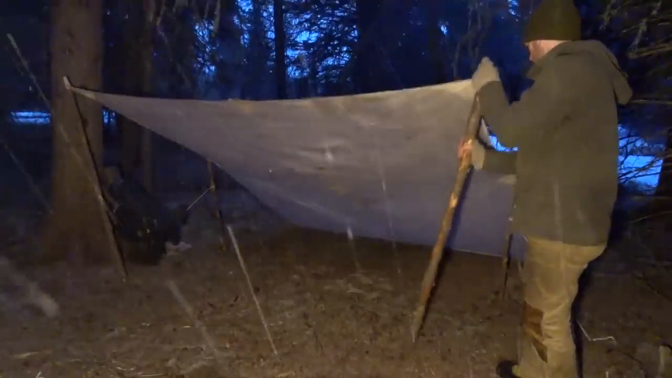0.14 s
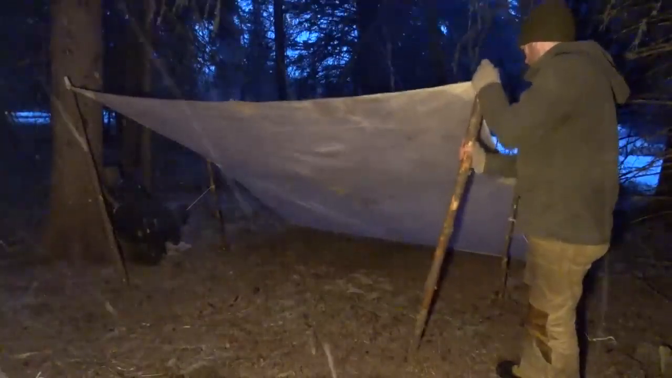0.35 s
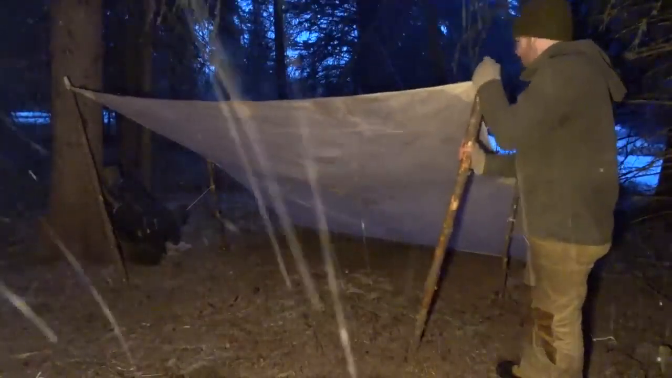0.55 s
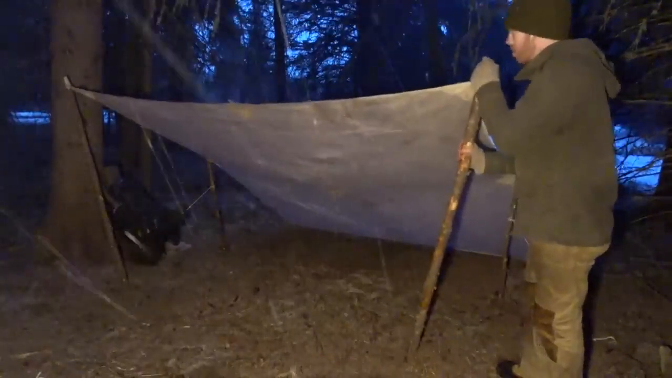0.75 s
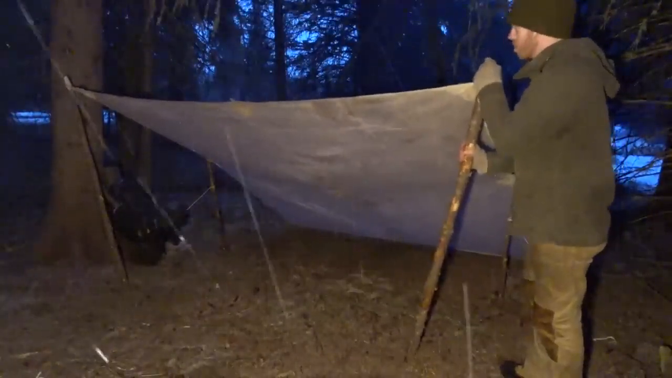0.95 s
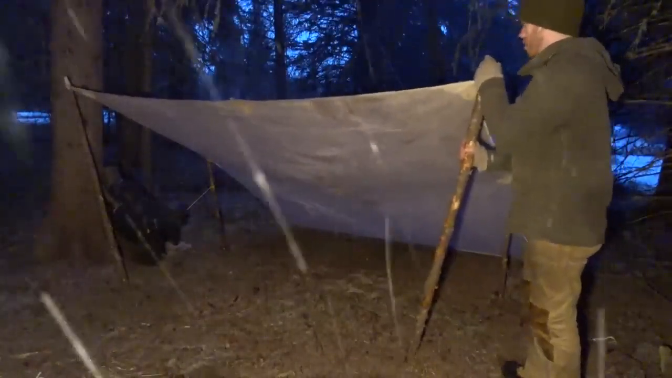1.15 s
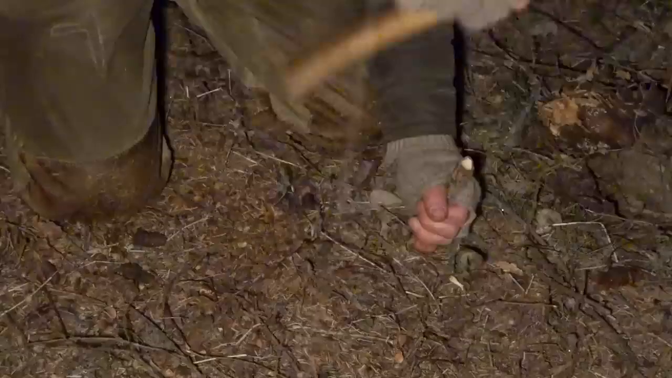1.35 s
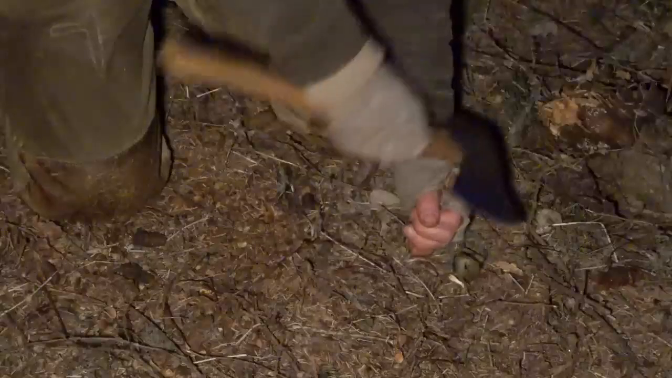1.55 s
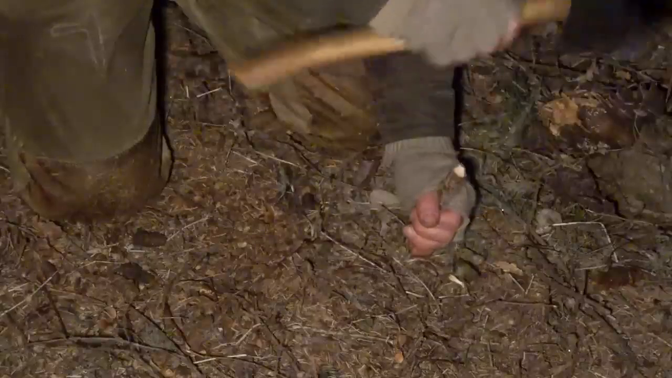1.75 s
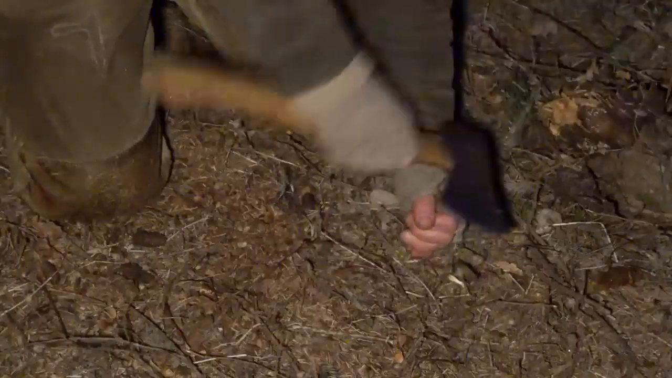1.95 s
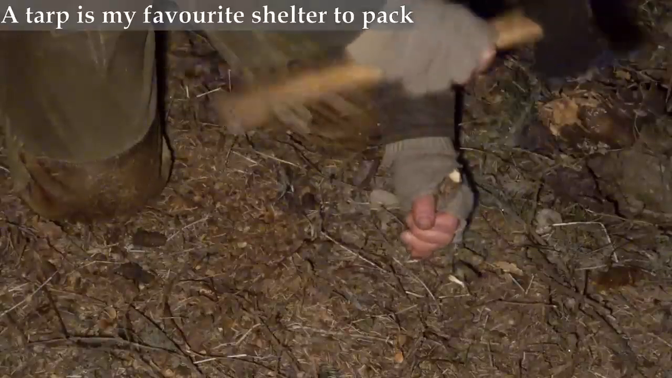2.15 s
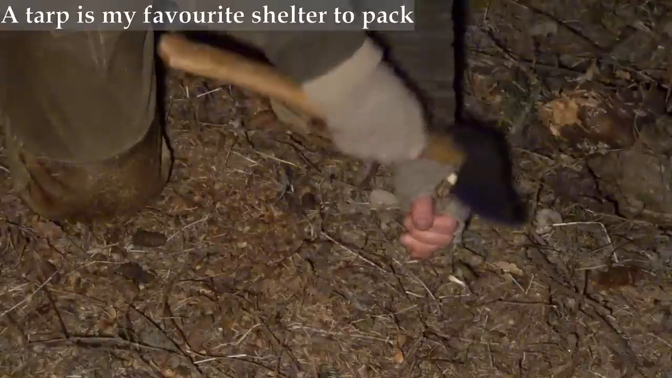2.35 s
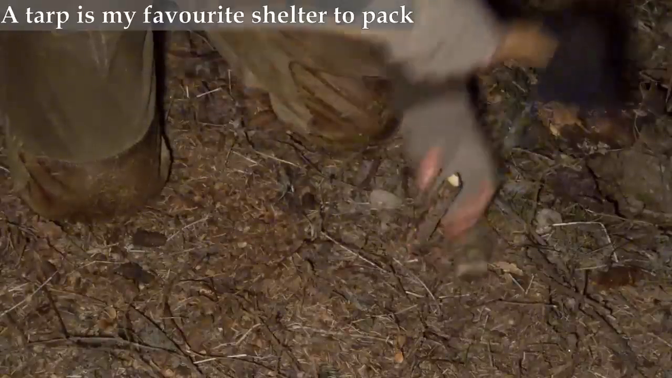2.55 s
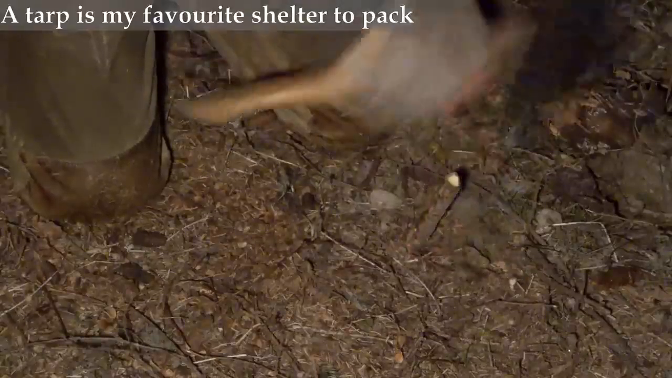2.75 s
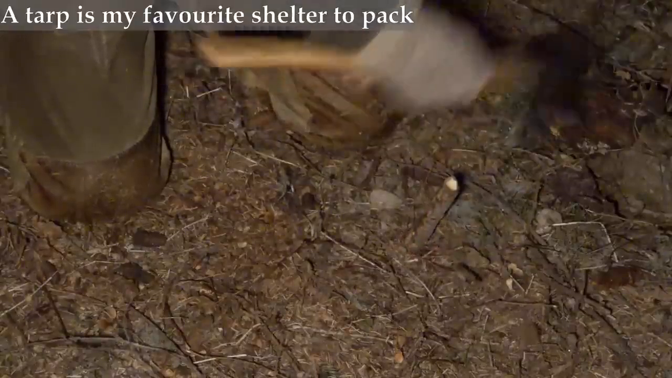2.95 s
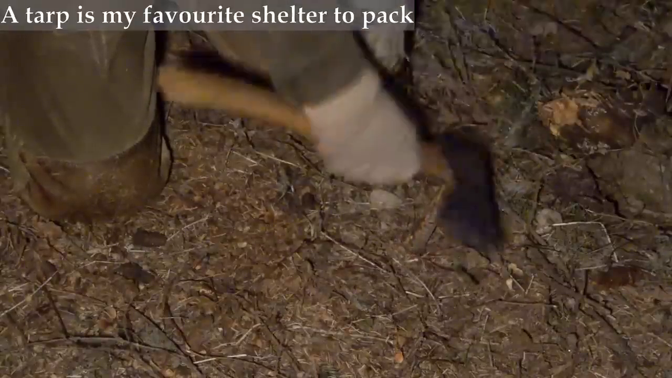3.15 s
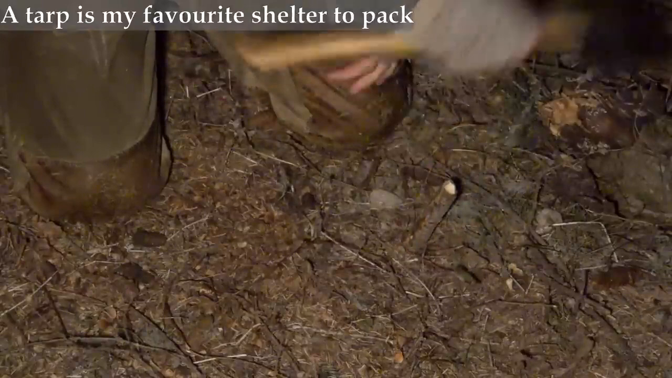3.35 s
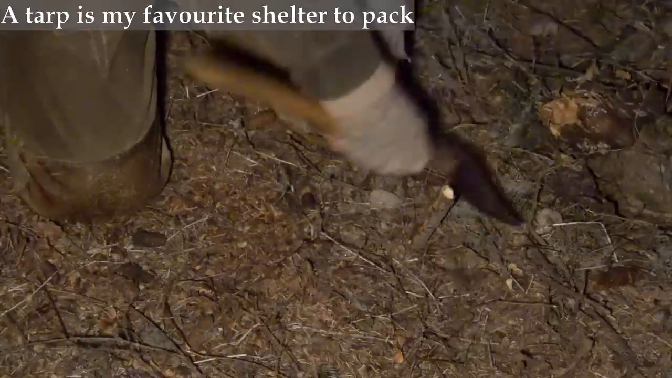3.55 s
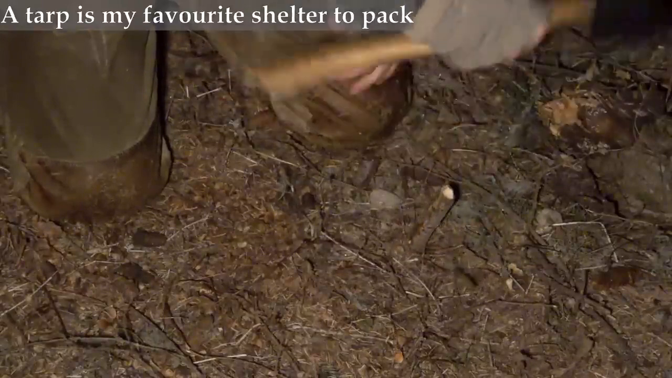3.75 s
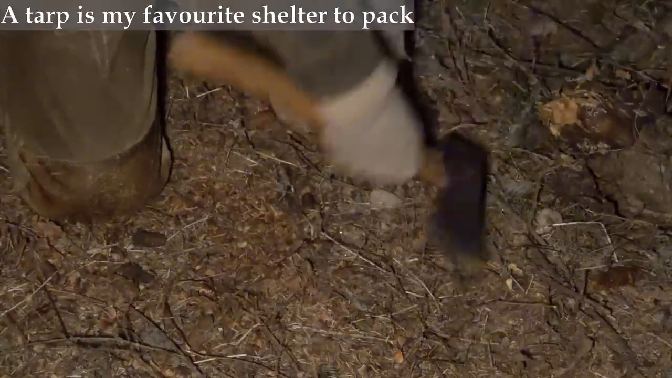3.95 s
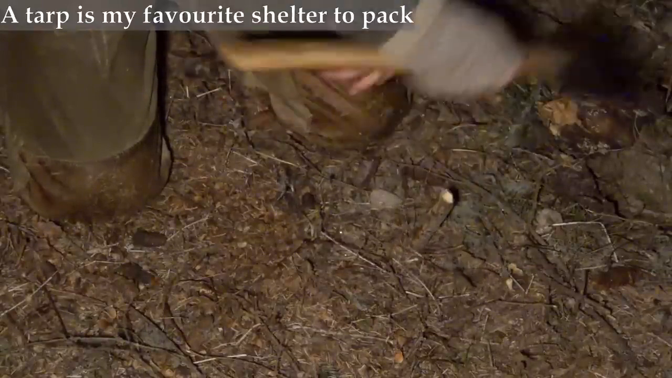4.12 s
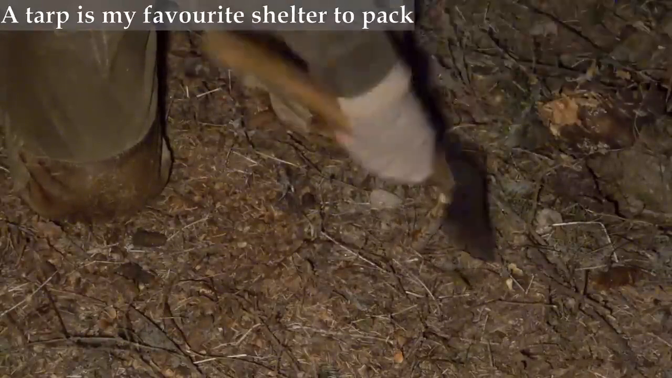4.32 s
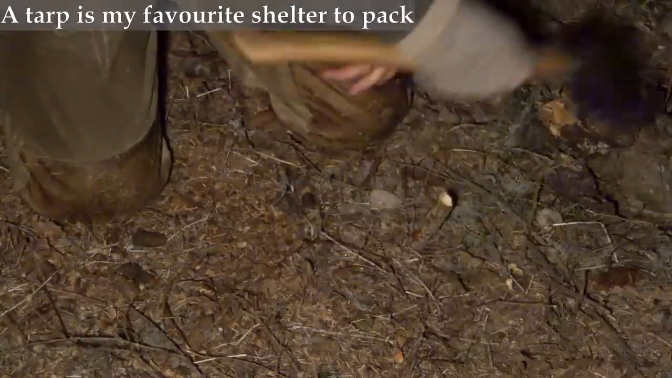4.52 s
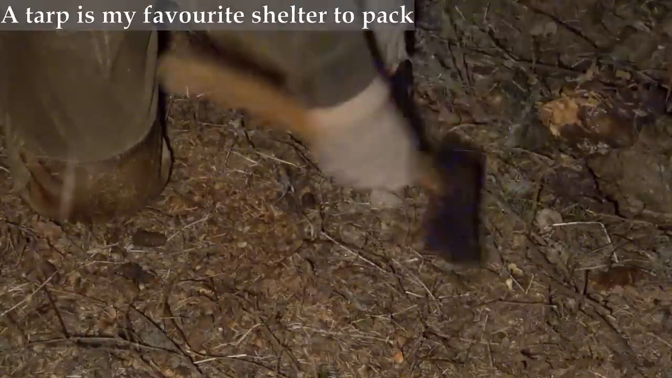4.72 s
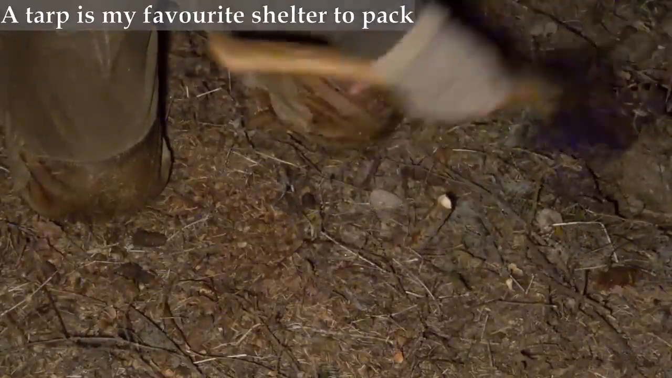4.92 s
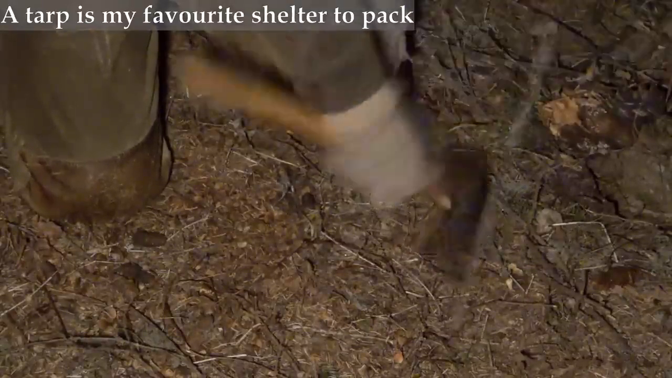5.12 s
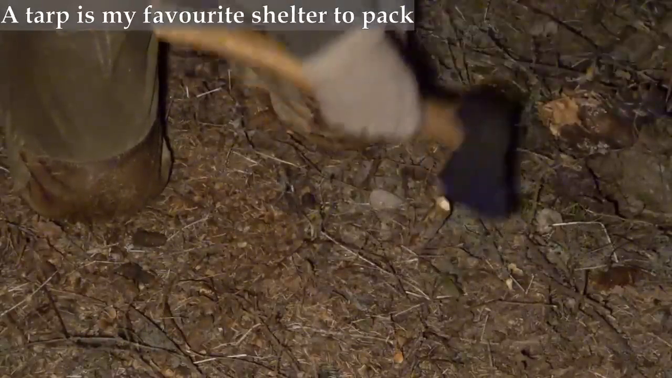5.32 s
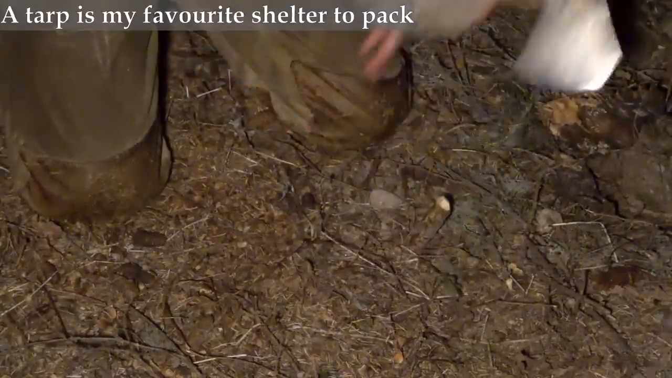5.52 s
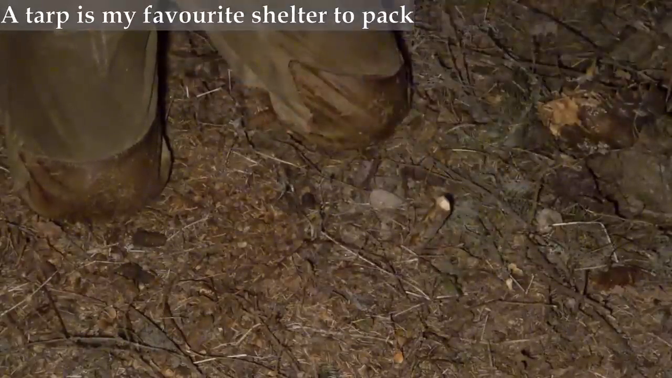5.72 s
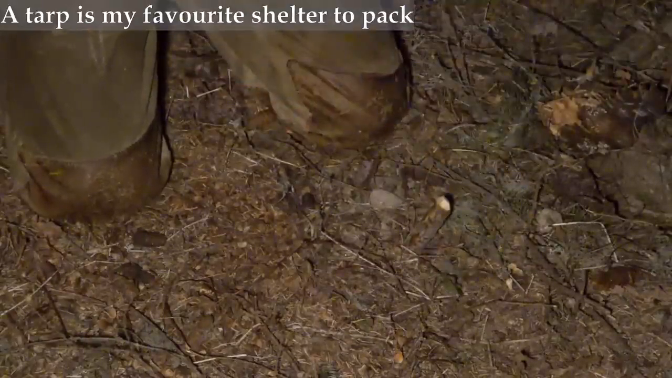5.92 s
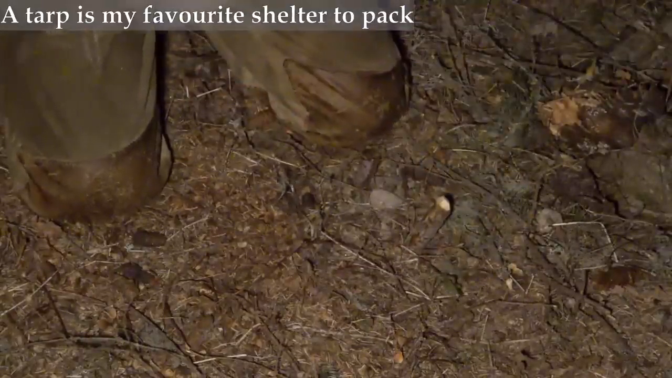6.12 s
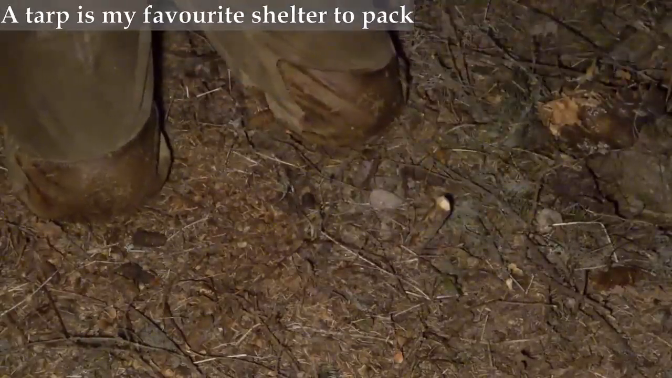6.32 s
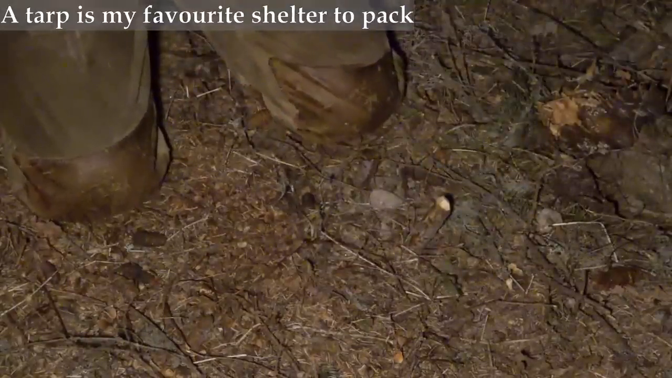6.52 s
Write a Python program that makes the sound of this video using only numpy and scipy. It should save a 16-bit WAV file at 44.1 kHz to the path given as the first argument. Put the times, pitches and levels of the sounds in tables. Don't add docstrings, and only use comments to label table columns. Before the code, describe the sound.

Cloth rustles briefly, then ten hard hatchet blows drive a wooden stake into forest soil, clanging and thudding with overloaded peaks, before faint rustling.

```python
import sys
import numpy as np
from scipy import signal
from scipy.io import wavfile

SR = 44100
rng = np.random.default_rng(int(sys.argv[2]) if len(sys.argv) > 2 else 0)


def elevation(decibels):
    levels = np.asarray(decibels, float)
    return 10 ** (levels / 20)


def unload_audio(sound):
    columns = np.transpose(np.atleast_2d(sound))
    steps = np.round(np.clip(columns, -1, 1) * 32767)
    wavfile.write(sys.argv[1], SR, steps.astype(np.int16))


N = 294147


def band(x, low_hz, high_hz):
    return signal.sosfilt(signal.butter(2, [low_hz, min(high_hz, .45 * SR)], "band", fs=SR, output="sos"), x)


def rms_one(x):
    return x / np.sqrt(np.mean(x ** 2) + 1e-20)


def at_hz(points, hz):
    point_hz, value = np.transpose(points)
    return np.interp(np.log(hz), np.log(point_hz), value)


def drift(rate):
    r = np.exp(-80 * np.pi * rate / SR)
    slow = signal.lfilter([1], [1, -2 * r, r * r], rng.standard_normal(N // 40 + 2002))[2000:]
    return np.interp(np.arange(N) / 40, np.arange(len(slow)), rms_one(slow))


def clicks(times, levels_db):
    out = np.zeros(N)
    out[np.round(np.asarray(times) * SR).astype(int)] = elevation(np.asarray(levels_db))
    return out


def ring(x, hz, t60, db=0):
    r = elevation(-60 / (t60 * SR))
    w = 2 * np.pi * hz / SR
    return signal.lfilter([0, elevation(db) * np.sin(w)], [1, -2 * r * np.cos(w), r * r], x + 1e-18)


def decay(x, t60):
    return signal.lfilter([1], [1, -elevation(-60 / (t60 * SR))], x + 1e-18)


def bursts(x, t60, low_hz, high_hz, size=N):
    noise = rms_one(band(rng.standard_normal(size), low_hz, high_hz))
    return decay(x, t60) * noise


def pings(rows, db):
    t = np.arange(4410) / SR
    out = np.zeros(N + len(t))
    for s, level_db, hz, cycles in rows:
        at = round(s * SR)
        out[at:at + len(t)] -= elevation(level_db + db - 60 * t * hz / cycles) * np.sin(2 * np.pi * hz * t)
    return out[:N]


# (pitch [Hz], level per Hz [dB])
AIR_COLOUR = [(12, -30), (20, 5), (80, -2.5), (205, -11), (433, -16), (900, -23), (2160, -27.5),
              (15000, -38)]
# (time [s], level [dB])
AIR_LEVEL = [(0.0, -52), (0.69, -53), (1.17, -51), (1.32, -54), (2.281, -56), (2.75, -54), (3.98, -57),
             (5.2, -57.5), (5.74, -55.5), (6.67, -56)]
# (pitch [Hz], likeness [-1 to 1])
AIR_LIKENESS = [(60, 0.7), (180, 0.38), (550, 0.29), (1650, 0.82), (4970, 0.19), (15000, 0.24)]


def air():
    out = 0
    together = drift(1.5)
    edges = 20 * 2 ** np.arange(0, 10, .5)
    white = rng.standard_normal((2, 2, N))
    for k, (low, high) in enumerate(zip(edges, edges[1:])):
        mid, side = band(white[k % 2], low, high)
        hz = np.sqrt(low * high)
        alike = np.clip(at_hz(AIR_LIKENESS, hz), -1, 1)
        flicker_db = (.5 + 2.0 / (1 + hz / 1500)) * (.4 * together + drift(8))
        gain = elevation(at_hz(AIR_COLOUR, min(hz, 13000)) + flicker_db)
        out = out + gain * (np.sqrt(1 + alike) * mid + np.sqrt(1 - alike) * side * [[1], [-1]])
    s, level_db = np.transpose(AIR_LEVEL)
    return rms_one(out) * elevation(np.interp(np.arange(N) / SR, s, level_db) + 7.5)


# (start [s], hold [s], rub level [dB], bright share [dB], low share [dB])
MOVEMENTS = [(0.033, .04, -70, -1, 0), (0.089, 0.0035, -25.5, -9, -15), (0.204, 0.032, -49.5, -11, -23),
             (0.295, 0.045, -40.5, -7, -23), (0.443, .07, -53.5, -11, -6), (.64, 0.35, -70.5, 3, -3),
             (0.943, .005, -56, -9, -11), (.958, 0.11, -61.5, 3.5, 1.5), (1.13, 0.077, -62.5, -1.5, -13),
             (1.235, .015, -53, -5, -12), (1.27, 0.076, -62, -1, 0.1), (2.508, 0.078, -51, -7, -10),
             (2.589, 0.068, -46.5, -5, -9), (2.677, .03, -55.5, -8, -11), (2.73, .06, -66, -12, 4),
             (5.578, 0.077, -54.5, -19, 0), (5.705, 0.054, -58, -7, 3), (5.81, 0.065, -65, -18, 6.5),
             (5.89, 0.026, -63, 7.5, 8), (5.96, 0.089, -69.5, -13, 12.5), (6.1, 0.094, -60, -13, 0),
             (6.252, 0.24, -61.5, -2.5, 1), (6.433, 0.0094, -50.5, 5, -3), (6.497, 0.022, -50, -9, -3),
             (6.537, 0.072, -57.5, -4.5, -1)]


def movements():
    start, hold, rub_db, bright_db, low_db = np.transpose(MOVEMENTS)[:, :, None]
    t = np.arange(0, N, 44) / SR
    rise_s, fall_s = 0.01 + .25 * hold, 0.016 + .45 * hold
    away = np.maximum((start - t) / rise_s, (t - start - hold) / fall_s)
    level_db = rub_db - 20 * np.clip(away, 0, 10)
    gains = []
    for share_db in (0, bright_db, low_db):
        power = np.sum(elevation(level_db + share_db) ** 2, axis=0)
        gains.append(np.interp(np.arange(N) / SR, t, np.sqrt(power)))
    return gains


# (time [s], peak level [dB], pitch [Hz])
EARLY_SNAPS = [(0.0408, -30, 5900), (0.0847, -35, 2050), (0.0912, -10, 2860), (0.0953, -15, 2800),
               (0.2174, -51, 2460), (0.2883, -21, 2770), (0.2933, -29, 2690), (0.3054, -16, 3160),
               (0.3159, -25, 2970), (0.3514, -26, 2990), (0.943, -29, 2850), (0.9584, -47.5, 2230),
               (0.9747, -35, 2750), (1, -30, 8760), (1.0774, -35, 6640), (1.0985, -32, 4000),
               (1.1156, -30, 6000), (1.2374, -36, 2390)]
# (time [s], peak level [dB], pitch [Hz])
LATE_SNAPS = [(5.563, -43, 1090), (5.74, -35.5, 1000), (5.989, -50, 890), (6.432, -41, 2340),
              (6.435, -35, 8750), (6.451, -34.5, 1160), (6.483, -31.5, 869), (6.498, -30.5, 2050),
              (6.507, -39, 910), (6.534, -31.5, 1200), (6.571, -38, 1170)]
# (time [s], peak level [dB], pitch [Hz])
STEPS = [
    (1.062, -38.5, 360),
    (1.328, -34.5, 373),
    (6.446, -41, 210),
]


def rustle():
    grains = elevation(4.5 * np.minimum(rng.exponential(1, N), 4)) * (rng.random(N) < 1500 / SR)
    rough = (0.54 + grains) * elevation(0.83 * drift(35))
    mid, side = rng.standard_normal((2, 2, 1, N)) * rough
    pair, other = mid + 0.21 * side * [[1], [-1]]
    dull = rms_one(band(pair, 1100, 3500))
    bright = rms_one(band(band(other, 3300, 10100), 2360, 15700))
    low = rms_one(band(other, 300, 1400))
    rubbing = sum(gain * part for gain, part in zip(movements(), (dull, bright, low)))
    snaps = list(EARLY_SNAPS) + list(LATE_SNAPS)
    crackle = elevation(-14.0) * bursts(clicks(*np.transpose(snaps)[:2]), 0.01, 1800, 8900)
    snapping = pings([(*row, 7.0) for row in snaps], -2.8) + crackle
    return rubbing + snapping + pings([(*row, 12.0) for row in STEPS], -1.6)


# (near level [dB], far level [dB], far t60 [s])
TREE_BANDS = [(3, -11, 0.23), (0.5, -12.5, 0.47), (0, -10.5, 0.12), (5.5, -5.5, 0.53), (4, -3, .55),
              (2, -7, 0.45), (-5.5, -12.5, 0.1), (-12, -21, 0.25)]
# (pitch [Hz], half width [Hz], t60 [s])
STEEL_ECHO = [(2808, 15, .62), (2990, 83, 0.44), (6460, 25, .35)]


def trees():
    clang_db, low_db, high_db, answer_db = np.transpose(STEEL)
    white = rng.standard_normal((2, 2, N))
    answer = clicks(BLOWS_S + 0.0036, answer_db)
    tail = 0
    for k, (near_db, far_db, far_t60) in enumerate(TREE_BANDS):
        low_hz = 273 * 2 ** (k * 2 / 3)
        if low_hz > 2500:
            answer = np.minimum(answer, elevation(-40.5))
        fading = elevation(near_db) * decay(answer, 0.11) + elevation(far_db) * decay(answer, far_t60)
        tail = tail + fading * rms_one(band(white[k % 2], low_hz, low_hz * 2 ** (2 / 3)))
    echo_levels_db = (low_db - 40.5, clang_db - 53.5, high_db - 36.0)
    for (hz, half_hz, t60), level_db in zip(STEEL_ECHO, echo_levels_db):
        strike = clicks(BLOWS_S + .004, level_db)
        tail += bursts(strike, t60, hz - half_hz, hz + half_hz, size=(2, N))
    mid, side = tail
    return mid + 0.83 * side * [[1], [-1]]


# (pitch [Hz], t60 [s], delay [s], left level [dB], right level [dB])
SWAY = (41.5, 0.45, .01, -1, -13.0)
# (pitch [Hz], t60 [s], delay [s], left level [dB], right gain over left [factor])
STAND_MODES = [(60, .4, 0.02, -1.5, -.9), (77.6, .3, .02, -2.5, -1.1), (91.7, .28, 0.0049, 1.5, .6),
               (94, .32, .0264, 5.5, -.9), (122.14, 0.1, .012, 2.5, -.7), (186, .07, 0.016, 3.5, -.9),
               (206, .11, .018, 4.5, -.9)]


def stand_shake():
    shake_db = -26.5
    hz, t60, delay, left_db, right_db = SWAY
    swell = ring(ring(clicks(BLOWS_S + delay, shake_db), hz, t60), hz, t60)
    swell = swell * np.e * np.log(1000) * 2 / (t60 * SR)
    out = swell * elevation(np.array([[left_db], [right_db]]))
    for hz, t60, delay, left_db, right in STAND_MODES:
        rocking = ring(clicks(BLOWS_S + delay, shake_db), hz, t60)
        out -= rocking * [[elevation(left_db)], [right * elevation(left_db)]]
    return out


def thud():
    soil_db, bending_db, upper_db = np.transpose(STAKE)[2:5]
    bending = ring(clicks(BLOWS_S + 0.0001, bending_db), hz=400, t60=0.044)
    bending += ring(clicks(BLOWS_S + .0001, upper_db), hz=500, t60=0.022)
    crush = bursts(clicks(BLOWS_S + 0.0026, np.maximum(soil_db, bending_db) - 16.5), 0.03, 120, 940)
    push = decay(clicks(BLOWS_S + .0046, soil_db - 26.0), 0.0065)
    return bending + crush - ring(push, hz=265, t60=0.046)


# (knock level [dB], knock pitch [Hz], soil level [dB], bending level [dB], upper bending level [dB])
STAKE = [
    (-7, 1900, -10.5, -22.5, -22.5),
    (-2.5, 5500, -9, -23.5, -12.5),
    (-6.5, 1500, -17.5, -7.5, -18),
    (1, 1100, -18.5, -9.5, -20),
    (-4.5, 760, -12, -4.5, -12.5),
    (2.5, 830, -14, -8, -9.5),
    (3.5, 1300, -10, -11, -12.5),
    (4, 1294, -11.5, -11.5, -17),
    (2.5, 1360, -7, -15.5, -11),
    (7.5, 1400, -6.5, -25, -5),
]
# (time [s], tick level [dB], knock level [dB], knock pitch [Hz], knock length [cycles])
BOUNCES = [
    (1.623, -48, -20, 745, 4.4),
    (3.6169, -9, -2.5, 1500, 6),
    (3.6041, -44, -33.5, 612, 5),
    (4.391, -41, -32, 606, 6.2),
    (4.788, -54.5, -44, 894, 7.3),
    (4.8154, -23.5, -10.5, 1090, 5.9),
    (5.271, -33, -11, 925, 2.3),
    (5.2749, -59, -18.5, 380, 19.5),
]


def stake():
    knock_db, knock_hz = np.transpose(STAKE)[:2]
    count = len(STAKE)
    knock = pings(zip(BLOWS_S, knock_db, knock_hz, [8.0] * count), 0)
    knock += pings(zip(BLOWS_S, knock_db, [2066] * count, [14.0] * count), -3.2)
    rattle = bursts(clicks(BLOWS_S, np.minimum(knock_db, -3.0) - 1.5), 0.021, 440, 2800)
    s, tick_db, *rings = np.transpose(BOUNCES)
    ticks = bursts(clicks(s, tick_db), .012, 1000, 4600)
    return knock + rattle + pings(zip(s, *rings), 0) + ticks


# (time [s], contact [s], loss [dB])
RESTING_CONTACT = (4.817, 0.032, -13)


def choke():
    s, contact_s, loss_db = RESTING_CONTACT
    t = np.arange(N) / SR
    next_blow_s = BLOWS_S[BLOWS_S > s][0]
    return elevation(loss_db * np.clip((t - s) / contact_s, 0, 1) * (t < next_blow_s))


BLOWS_S = np.array([1.5656, 1.9852, 2.3472, 2.8857, 3.232, 3.6123, 3.996, 4.401, 4.7974, 5.209])
# (gripped clang [dB], low ring [dB], high ring [dB], answer of the trees [dB])
STEEL = [
    (17.5, -15, -16, -36),
    (12, -11.5, -14, -36.5),
    (6.5, -1.5, -11, -42),
    (4, 2.5, -14, -40.5),
    (-15, -19, -25, -46.5),
    (-4.5, -18, -21, -41.5),
    (-11, -6, -23.5, -43),
    (-9, -22, -24, -43.5),
    (-31, -5, -24, -44.5),
    (-16.5, -3.5, -24, -40.5),
]
# (pitch [Hz], t60 [s], level [dB])
LOW_PARTNERS = [(2615, .12, -31), (7232, .08, -21), (7750, .04, -22)]
# (pitch [Hz], t60 [s], level [dB])
HIGH_PARTNERS = [(4260, .03, -10), (8300, .03, -12), (10500, .02, -16)]


def hatchet():
    clang_db, low_db, high_db, _ = np.transpose(STEEL)
    crack_db = np.maximum(-8.0 + .6 * clang_db, -15.5)
    crack = bursts(clicks(BLOWS_S, crack_db + 4.5), 0.01, 1500, 7300)
    crack += bursts(clicks(BLOWS_S, crack_db - 18.5), 0.017, 11000, 18000)
    clang = ring(clicks(BLOWS_S, clang_db), hz=2990, t60=0.01)
    low_ring = choke() * ring(clicks(BLOWS_S, low_db), hz=2810, t60=0.077)
    high = clicks(BLOWS_S, high_db)
    steel = clang + low_ring - ring(high, hz=6544, t60=.11)
    low = clicks(BLOWS_S, np.minimum(low_db, -6.5))
    steel += sum(ring(low * elevation(rng.normal(0, 2, N)), *mode) for mode in LOW_PARTNERS)
    shimmer = sum(ring(high * elevation(rng.normal(0, 2.8, N)), *mode) for mode in HIGH_PARTNERS)
    return crack - steel + shimmer


def scene():
    blow = hatchet() + stake()
    left_lag = .62
    late = (1 - left_lag) * blow + left_lag * np.roll(blow, 1)
    near = np.array([late * elevation(2.5), blow]) + thud() * elevation(np.array([[1.2], [-1.2]]))
    return near + rustle() * elevation(np.array([[.4], [-.4]])) + trees() + stand_shake() + air()


def top_cut(x):
    return signal.sosfilt(signal.butter(12, 16260, fs=SR, output="sos"), x)


def record(dry):
    clipped = np.clip(dry, -1, 1)
    low_pass = signal.cheby2(30, 60, 15950, fs=SR, output="sos")
    mix = signal.sosfilt(low_pass, clipped)
    return top_cut(mix)


dry = scene()
out = record(dry)
unload_audio(out)
```